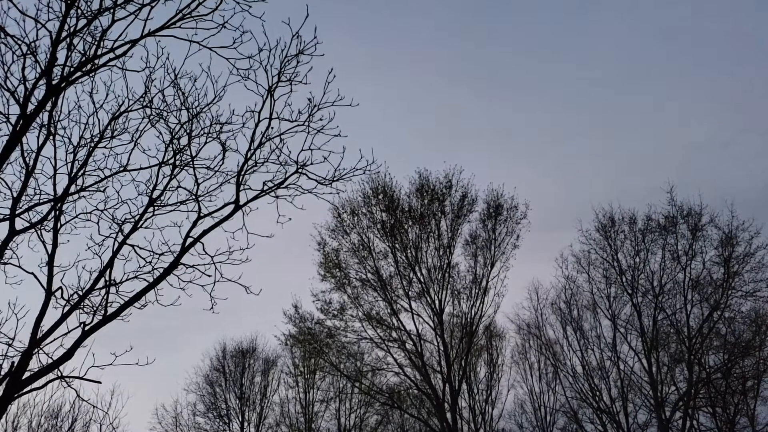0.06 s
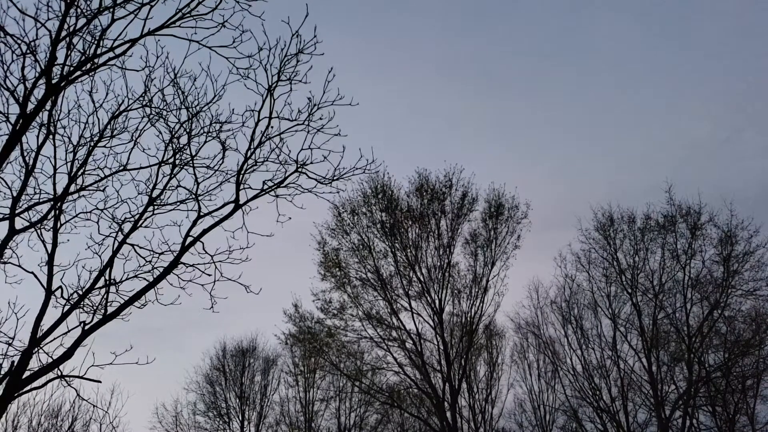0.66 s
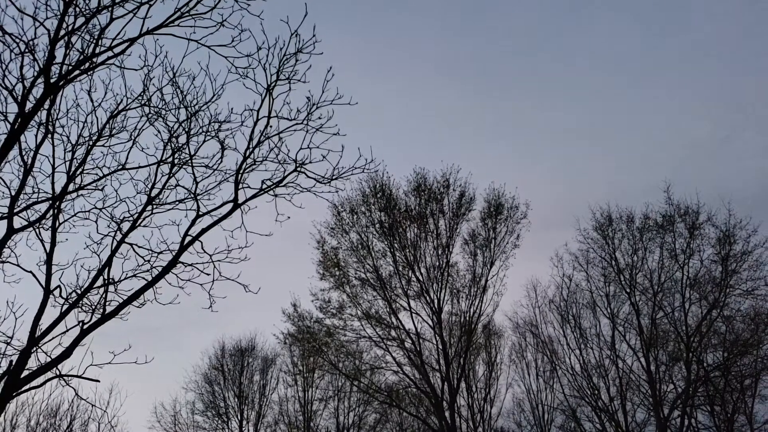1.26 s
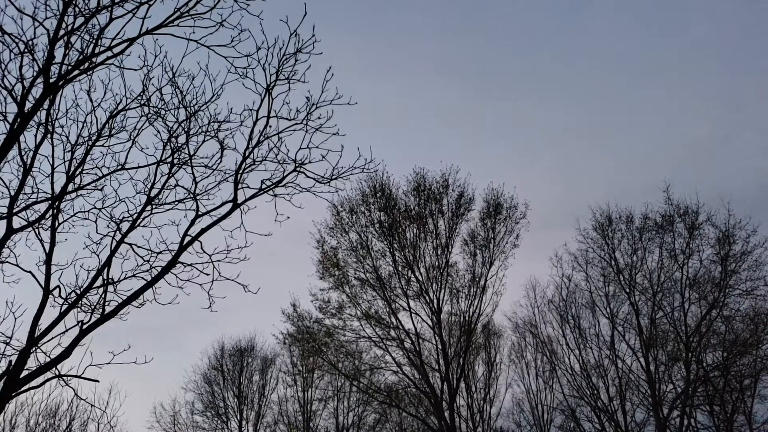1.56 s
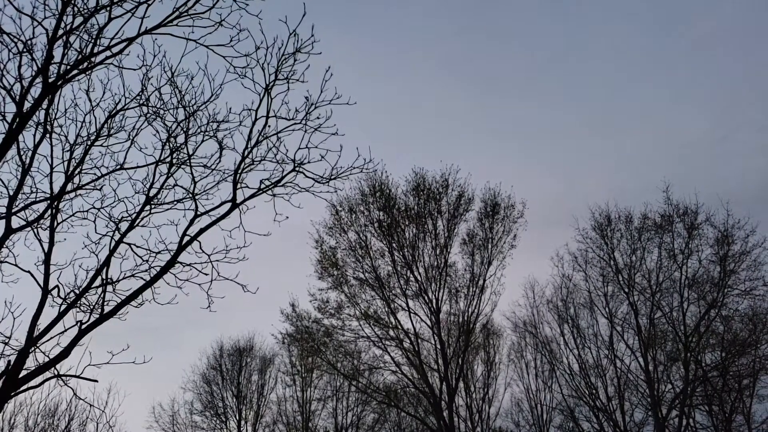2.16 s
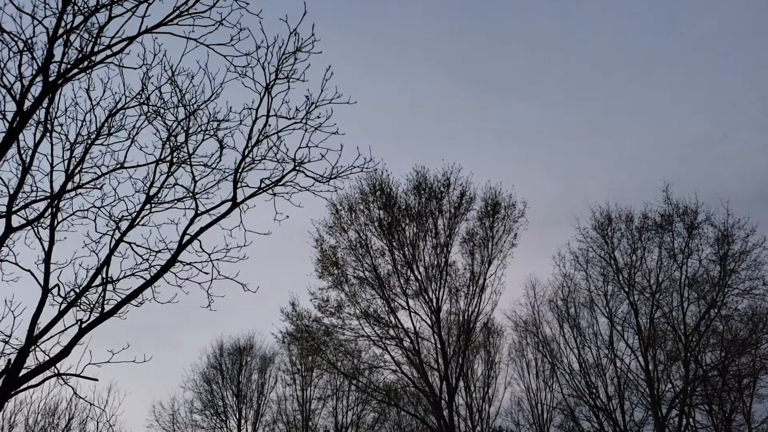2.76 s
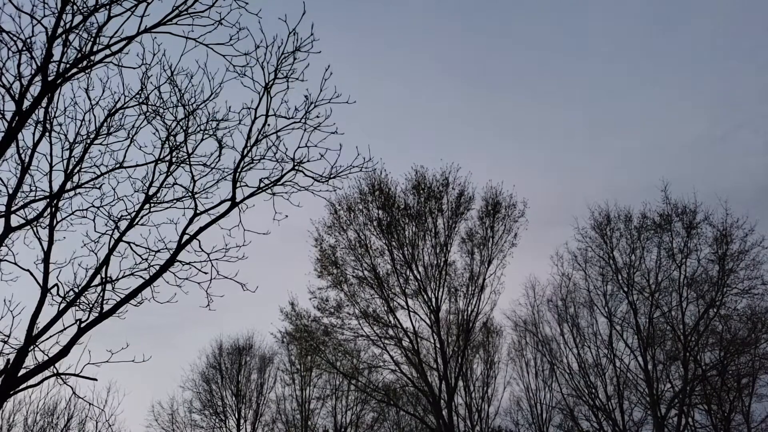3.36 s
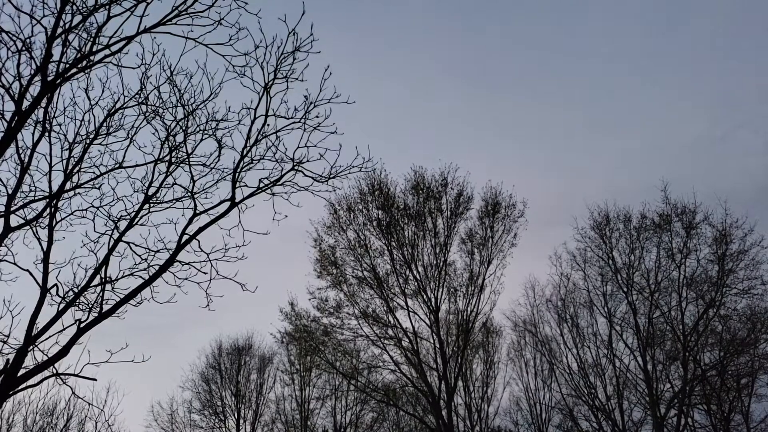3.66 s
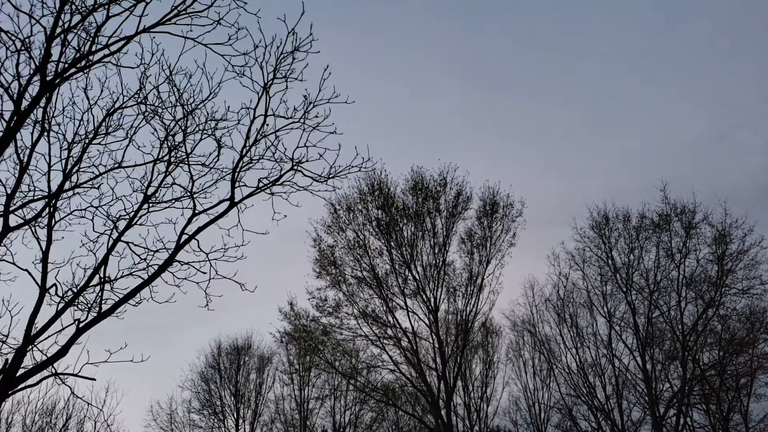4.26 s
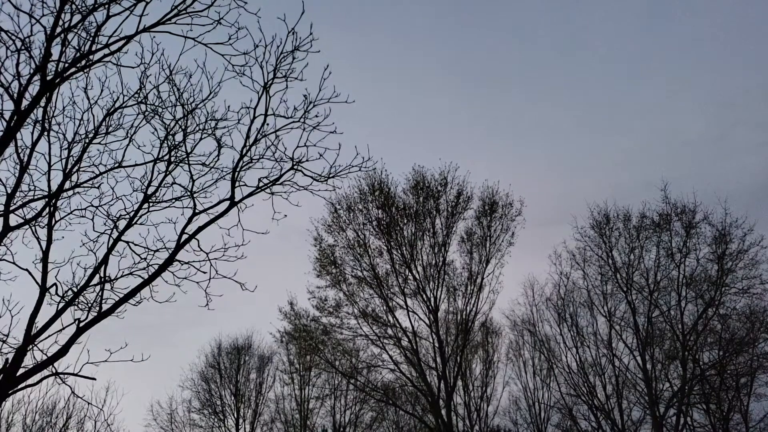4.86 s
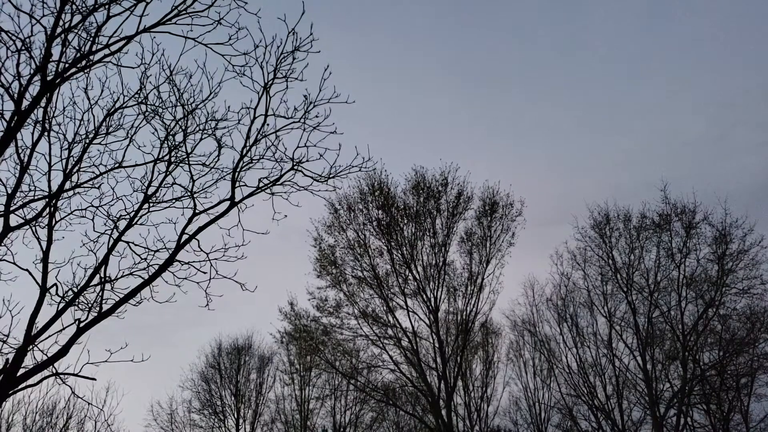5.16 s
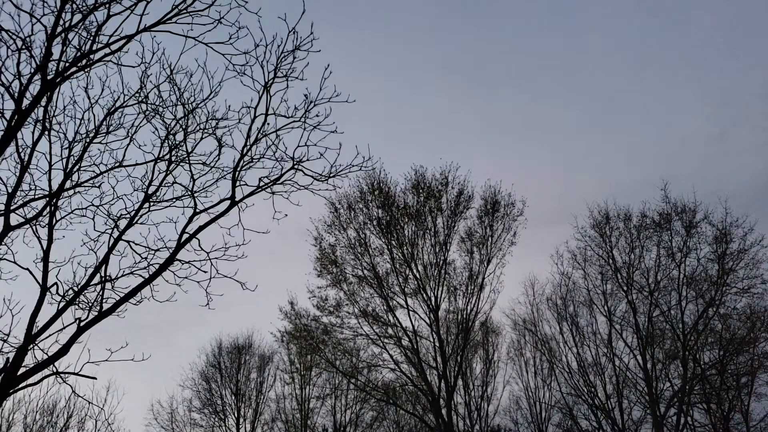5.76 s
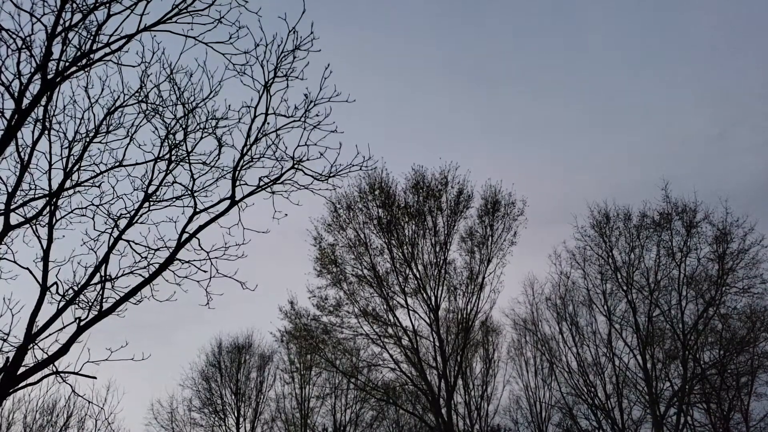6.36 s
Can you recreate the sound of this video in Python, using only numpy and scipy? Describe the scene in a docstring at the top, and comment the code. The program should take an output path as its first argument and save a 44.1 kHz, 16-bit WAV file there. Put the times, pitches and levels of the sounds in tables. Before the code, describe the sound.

A nightingale sings short, varied phrases of whips, trills and whistles among trees, with faint distant birds over a low rumble and hiss.

```python
"""Over a distant rumble and a faint hiss, a nightingale opens with swooping whips and warbles at dusk.
Low chucks, buzzing trills, a rattle and rising whistles follow, all from its syrinx (a bird's voice
box): a nearly pure tone that it bends and shakes. Farther off, other birds repeat a soft fluting tune,
chips and a nasal falling whine, and something hums faintly. The twigs and trunks of bare trees scatter
every bird's notes, and two spaced microphones hear it all."""
import sys
import numpy as np
from scipy import signal
from scipy.fft import rfft, irfft, next_fast_len
from scipy.io import wavfile
from scipy.ndimage import uniform_filter1d, map_coordinates

SR = 44100
rng = np.random.default_rng(int(sys.argv[2]) if len(sys.argv) > 2 else 0)


def materialize(psi):
    """Save the field psi as 16-bit PCM at rate SR to the path in sys.argv[1].

    A 1-D psi becomes a single channel; in a 2-D psi each row is a channel.
    """
    bounded = np.clip(np.atleast_2d(psi).T, -1, 1)
    quanta = np.round(bounded * 32767).astype(np.int16)
    wavfile.write(sys.argv[1], SR, quanta)


N = 291942

# Levels in the tables are relative: filters and the final mix turn them up or down.
# The nightingale's note shapes: (time into the note [s], pitch [Hz], level [dB])
WHIP = [(0, 3259, -9.5), (.015, 3940, -12.5), (.027, 5485, -24), (.037, 6327, -5), (.047, 5852, -11.5),
        (.056, 4146, 2.5), (.069, 3197, -3.5), (.098, 2763, -4), (.113, 2517, -11)]  # up to a high turn, then a steep fall that flattens out
TICK = [(0, 2694, -13.5), (.008, 3224, 1), (.014, 4404, -13.5), (.019, 3100, -6.5), (.028, 2430, -8)]  # a quick peak in pitch after each whip
CHUCK_LOW = [(0, 2757, 5), (.012, 2214, 1.5), (.03, 2030, 0.5), (.056, 1552, -20.5)]  # one side of the syrinx falls in pitch...
CHUCK_HIGH = [(.008, 3633, -11), (.023, 2797, -2.5), (.039, 2200, -3), (.057, 1963, -7)]  # ...and the other follows, higher
PLUNGE = [(0, 2204, 6), (.0055, 3282, 4.5), (.015, 2318, 4.5), (.028, 2167, 3), (.043, 1830, -9.5),
          (.06, 1539, -7), (.077, 1540, -11.5)]  # a flick up and a long slide to the bottom of the voice
TOOT = [(0, 2070, -3), (.013, 2013, 7), (.028, 1970, -8.5), (.042, 1880, 12)]  # a low answer to each slide
HOOK = [(0, 2397, -16), (.009, 3095, -10), (.027, 3288, 7.5), (.031, 4155, -6.5), (.038, 2422, -8.5),
        (.052, 2860, 0.5), (.065, 2576, -6), (.08, 2178, -22)]  # an arch with a flick on top
RISE = [(0, 2267, -9), (.013, 2580, -4.5), (.026, 3160, -1), (.042, 3373, 8), (.057, 3684, -12),
        (.073, 3684, -1.5), (.09, 3730, -17), (.117, 3830, -25)]  # a whistle that climbs out of the hook
# A pure start that leaps into a wide shake:
# (time into the note [s], pitch [Hz], level [dB], shake depth [Hz])
ZIP = [(0, 4650, -15, 50), (.009, 4170, 3.5, 130), (.016, 5230, -9, 610), (.028, 5660, -4, 530),
       (.037, 5600, -46, 450)]
# When each shape is sung: (time [s], level [dB], swell from start to end [dB])
WHIP_EVENTS = [(.536, -27.5, -2), (0.883, -24.5, -16.5)]
TICK_EVENTS = [(0.676, -23.5, 0), (1.036, -25.5, -1.7)]
CHUCK_EVENTS = [(2.188, -38.5, -3), (2.3, -35.5, 3), (2.417, -37.5, 2)]
PLUNGE_EVENTS = [(4.51, -39, 0.5), (5.129, -36.5, -1)]
TOOT_EVENTS = [(4.586, -39.5, -3), (4.978, -39.5, -7), (5.213, -39, -11)]
HOOK_EVENTS = [(6.244, -26.5, -7), (6.477, -29, 2)]
RISE_EVENTS = [(6.322, -25, 0), (6.566, -30.5, 0)]
ZIP_EVENTS = [(3.394, -26, 7), (3.455, -24.5, -3), (3.508, -24.5, 12), (3.723, -31, 29), (3.786, -27, 6),
              (3.854, -32.5, 22)]
# Held, shaken notes: (time [s], length [s], pitch [Hz], level [dB])
WARBLES = [(0.721, .114, 2425, -30), (1.081, .086, 2402, -33)]
# A low rattling buzz: (time [s], pitch [Hz], level [dB], shake depth [Hz])
RATTLE = [(4.714, 2473, -42, 202.5), (4.74, 2297, -33, 227), (4.86, 2245, -34.5, 248),
          (4.89, 2126, -38, 211)]
# Notes sung once, point by point: (time [s], pitch [Hz], level [dB])
BUZZES = [
    [(3.267, 4960, -54), (3.295, 4710, -42), (3.313, 4090, -28.5), (3.333, 3490, -21), (3.359, 3236, -26),
     (3.371, 2370, -44.5)],
    [(3.561, 4220, -34), (3.584, 4214, -25), (3.607, 3814, -23.5), (3.63, 3430, -18), (3.68, 3240, -26),
     (3.689, 2610, -42.5)],
]  # two long falling buzzes
SLIDE = [(4.893, 2550, -28.5), (4.929, 2084, -32.5), (4.942, 1708, -44.5), (4.976, 1603, -39)]  # the low end of the rattle
FLOURISH = [
    [(6.083, 5420, -56), (6.093, 3545, -23), (6.101, 4120, -30.5), (6.109, 5540, -38)],
    [(6.106, 2930, -34), (6.114, 4060, -21), (6.132, 4180, -29.5), (6.15, 4000, -35)],
    [(6.135, 6040, -39), (6.153, 5740, -37), (6.172, 5500, -37.5), (6.208, 5160, -43)],
]  # three linked notes
# The colour of the song: (frequency [Hz], level [dB])
CLEAN_OVERTONES = [(4000, -17), (5200, -20.5), (6200, -31.5), (7200, -20.5), (8700, -31), (9900, -20),
                   (11000, -6), (11800, -10.5), (12800, -17), (14000, -10), (16000, 0)]  # what the throat lets through in clean notes and trills
RASPY_OVERTONES = [(3500, -26.5), (4800, -29), (6200, -32.5), (7100, -35.5), (8500, -43), (9800, -36.5),
                   (11000, -39), (12300, -31), (14000, -44), (15500, -42)]  # the same for low notes
WARBLE_OVERTONES = [(4800, -22.5), (7200, -26), (9600, -65), (12000, -42), (14000, -29.5), (16000, -66)]  # the same for warbles
SONG_COLOUR = [(2500, 0), (3300, .5), (4200, 0), (5000, -5.5), (5800, -2), (6600, -2), (10500, 3),
               (13000, -2), (15500, 3)]  # the near song's overall tone, with a dip around 5 kHz

# A farther bird's whines: (time [s], length [s], start pitch [Hz], end pitch [Hz], level [dB])
WHINES = [(1.999, 0.32, 855, 744, -62), (2.539, 0.33, 891.5, 725, -68), (4.773, .34, 849.5, 727, -64)]
# What its throat lets through: (frequency [Hz], level [dB])
WHINE_THROAT = [(2500, -53), (2900, 11), (3400, 15.5), (4100, -17), (4550, -2.5), (5100, -0.5),
                (5700, -7.5), (6300, -4.5), (6800, -6.5), (7600, -11), (8500, -33), (10000, -65)]
# A distant fluting tune: (time into the tune [s], pitch [Hz], level [dB])
FLUTE = [(0, 2574, 1), (.02, 2717, 8.5), (.047, 2764, 10), (.062, 2608, 9.5), (.073, 2304, 0),
         (.09, 2700, 4), (.112, 2350, 2), (.135, 2520, 4), (.16, 2300, -35)]
# Short glides: (time [s], length [s], start pitch [Hz], end pitch [Hz], level [dB])
SEESAW = [(0, 0.0245, 3260, 3900, -0.5), (0.064, .02, 5300, 5830, -15.5), (0.101, .034, 5820, 4800, -15),
          (.179, 0.034, 4550, 3020, -5)]  # a call of two chips up and two down, timed from its own start
CHIPS = [(0.217, 0.01, 7100, 7800, -58.5), (0.386, 0.019, 4470, 3870, -60.5),
         (0.443, 0.047, 2690, 2670, -58), (1.945, 0.017, 3126, 3950, -47.5),
         (2.367, 0.0095, 7170, 7650, -57.5), (3.909, 0.15, 2383, 2134, -61.5),
         (4.563, 0.042, 3470, 3393, -54), (5.653, 0.14, 6860, 6790, -76)]  # faint single chips and thin whistles
# When the tune and the see-saw call are sung: (time [s], level [dB])
FLUTE_EVENTS = [(1.376, -55), (1.606, -53), (1.838, -52.5), (2.061, -52), (2.529, -54), (2.923, -64.5),
                (5.607, -55), (5.837, -53.5), (6.062, -51.5)]
SEESAW_EVENTS = [(1.246, -47.5), (1.592, -49)]

# The beak points away, so the straight path is weakened: (frequency [Hz], level [dB])
BEAK_SHADE = [(3000, -7.5), (6000, -11.5), (12000, -8)]
# How long the trees echo: (frequency [Hz], time to fade by 60 dB [s])
WOOD_DECAY = [(1500, 0.73), (3000, 0.51), (6000, 0.54), (12000, 0.37)]
# Which side is louder: (frequency [Hz], left minus right [dB])
SONG_BALANCE = [(1800, -4), (2200, -3), (2500, -.5), (3000, 4.5), (4000, 6), (6000, 4), (12000, 3.5)]
AIR_BALANCE = [(60, 2), (150, 2.0), (380, 2), (950, -4), (2380, -2), (5980, 2), (15000, 0)]
# A faint far hum: (time [s], pitch [Hz], level [dB])
HUM = [(0.196, 167, -67), (.45, 175.2, -54), (.95, 170.7, -60.5), (1.15, 172.4, -70), (1.6, 167, -71)]
# The colour of the rumble and hiss: (frequency [Hz], level [dB])
AIR_COLOUR = [(13, -77), (22, -25), (59, 1), (109, -2.5), (147, -8), (326, -10), (354, -13), (667, -14),
              (954, -23), (2060, -32.5), (2240, -25.5), (2570, -22.5), (3480, -27.5), (5110, -44.5),
              (15800, -59.5)]
# How alike they are left and right: (frequency [Hz], likeness [1 the same, -1 opposite])
AIR_LIKENESS = [(60, 1), (130, 0.96), (290, 0.92), (640, 0.33), (1410, -0.75), (3100, 0.39), (6820, -0.11),
                (15000, -0.916)]


def nightingale():
    """The near singer's five kinds of note, with one overall tone colour."""
    clean = (sung(WHIP, WHIP_EVENTS) + sung(TICK, TICK_EVENTS) + FLOURISH
             + sung(HOOK, HOOK_EVENTS) + sung(RISE, RISE_EVENTS))
    throaty = (sung(CHUCK_LOW, CHUCK_EVENTS) + sung(CHUCK_HIGH, CHUCK_EVENTS)
               + sung(PLUNGE, PLUNGE_EVENTS) + [SLIDE] + sung(TOOT, TOOT_EVENTS))
    warbles = [warble(*row) for row in WARBLES]
    trills = [buzz(curve) for curve in BUZZES] + sung(ZIP, ZIP_EVENTS)
    song = plain_notes(clean, CLEAN_OVERTONES, jitter=.004, fall_db=36)
    song += plain_notes(throaty, RASPY_OVERTONES, jitter=.023, fall_db=1)
    song += shaken_notes(warbles, WARBLE_OVERTONES, shake_hz=56, throb_db=-2, jitter=.021, fall_db=1.5)
    song += shaken_notes(trills, CLEAN_OVERTONES, shake_hz=120, throb_db=2, jitter=.004, fall_db=31)
    song += shaken_notes([RATTLE], RASPY_OVERTONES, shake_hz=123.3, throb_db=-.5,
                         jitter=.0208, fall_db=-.5)
    return filtered(song, lambda hz: amp(along(SONG_COLOUR, hz)))


def sung(shape, events):
    """One note per event: the shape moved to its time and level, swelling or fading as it goes."""
    length = shape[-1][0]
    return [[(start + t, hz, db + shape_db + swell_db * (t / length - .5), *rest)
             for t, hz, shape_db, *rest in shape]
            for start, db, swell_db in events]


def warble(start, length, hz, db, depth_hz=112, sag_hz_per_s=820, release_s=.0163):
    """The path of one warble, whose held pitch slowly sinks."""
    hold = length - release_s
    corners = [(0, hz - 150, db - 1), (.0147, hz, db),  # scoop up
               (hold, hz - sag_hz_per_s * hold, db),
               (length, hz - 310, db - 6.5)]  # drop away
    return [(start + t, pitch, level, depth_hz) for t, pitch, level in corners]


def buzz(curve, calm_hz=3050, shake_share=.27, open_s=.041):
    """The path of one buzz: a pure start, then a shake that opens and narrows as the pitch falls."""
    start = curve[0][0]
    return [(t, hz, db, shake_share * max(0, hz - calm_hz) * min(1, (t - start) / open_s))
            for t, hz, db in curve]


def plain_notes(notes, overtones, jitter, fall_db):
    """Notes that each glide along one smooth pitch path."""
    out = np.zeros(N)
    for rows in notes:
        t, hz, loud = gesture(rows)
        add(out, rows[0][0], loud * syrinx(hz, jitter, overtones, fall_db))
    return out


def shaken_notes(notes, overtones, shake_hz, throb_db, jitter, fall_db):
    """Notes whose pitch swings fast; a positive throb makes the bottom of each swing the loudest."""
    out = np.zeros(N)
    for rows in notes:
        t, hz, loud, depth_hz = gesture(rows)
        swing = np.cos(2 * np.pi * shake_hz * t)
        tone = syrinx(hz - depth_hz * swing, jitter, overtones, fall_db)
        add(out, rows[0][0], loud * amp(throb_db * swing) * tone)
    return out


def syrinx(hz, jitter, overtones, fall_db, throat_hz=2100):
    """A nearly pure tone; its overtones stand out when it sinks below the throat's own ringing pitch."""
    harmonic = np.arange(2, 11)[:, None]
    phase = cycles(hz, jitter)
    boost_db = 36 * np.maximum(0, np.log2(throat_hz / hz))
    slope_db = fall_db * np.log2(harmonic / 2)  # overtones lose fall_db with each octave
    leak = amp(along(overtones, harmonic * hz) + boost_db - slope_db) * (harmonic * hz < SR / 2)
    return np.sin(phase) + np.sum(leak * np.sin(harmonic * phase), axis=0)


def whining_bird(bend=1.8, waver_db=1.5, wavers_per_s=9.3):
    """A nasal buzz that falls ever faster; the throat passes only its upper harmonics."""
    out = np.zeros(N)
    harmonic = np.arange(3, 13)[:, None]
    for start, length, start_hz, end_hz, db in WHINES:
        t, _, loud = gesture([(0, start_hz, db + .5), (length / 10, start_hz, db), (length, end_hz, db)])
        hz = start_hz + (end_hz - start_hz) * (t / length) ** bend
        waver = waver_db * np.array([wobble(wavers_per_s, len(t)) for _ in harmonic])
        gains = amp(along(WHINE_THROAT, harmonic * hz) + waver)
        tone = np.sum(gains * np.sin(harmonic * cycles(hz, jitter=.002)), axis=0)
        add(out, start, loud * tone)
    return out


def far_birds():
    """Pure whistles: a fluting tune, a little higher or lower each time, a see-saw call and chips."""
    out = np.zeros(N)
    t, hz, loud = gesture(FLUTE, glide_s=.0019)
    for start, db in FLUTE_EVENTS:
        tuning = 1 + .006 * rng.standard_normal()
        add(out, start, amp(db) * loud * np.sin(cycles(hz * tuning, jitter=.004)))
    seesaws = [(start + after, *glide, db + chip_db)
               for start, db in SEESAW_EVENTS for after, *glide, chip_db in SEESAW]
    for start, length, start_hz, end_hz, db in seesaws + CHIPS:
        t, hz, loud = gesture([(0, start_hz, db), (length, end_hz, db)], edge_s=.0026)
        add(out, start, loud * np.sin(cycles(hz, jitter=.011)))
    return out


def among_trees(song, balance, lead_ms, twigs_db, twigs_fade_s, wood_db, wood_lean=.16):
    """The straight path and the twigs' echoes come from the perch; the wood answers from all round."""
    straight = filtered(song, lambda hz: amp(along(BEAK_SHADE, hz)))
    perch = straight + amp(twigs_db) * twig_echoes(song, twigs_fade_s)
    wood = filtered(wood_echoes(song, wood_db), lambda hz: panned(wood_lean * along(balance, hz)))
    return at_microphones(perch, balance, lead_ms) + wood


def twig_echoes(song, fade_s, directions=12):
    """Quick echoes from the branches round the perch; they change as the bird turns its head."""
    out = np.zeros((2, N))
    t = np.arange(SR // 4) / SR
    facing = np.linspace(0, directions - 1, N)
    for direction in range(directions):
        spikes = rng.standard_normal((3, len(t))) ** 3  # a few strong echoes among many weak ones
        twigs = spikes[0] + spikes[1:]  # shared echoes plus each side's own
        tails = unit(twigs * amp(-60 * t / fade_s) * (t > .004)) / np.sqrt(len(t))
        share = np.maximum(0, 1 - abs(facing - direction))
        active = np.flatnonzero(share)
        for side, tail in zip(out, tails):
            add(side, active[0] / SR, signal.fftconvolve((song * share)[active], tail))
    return out


def wood_echoes(song, db):
    """The trunks scatter the song so that it rings on, longest in the low notes."""
    hz, t, noise = signal.stft(rng.standard_normal((2, SR)), SR, nperseg=256)
    fade = amp(-60 * t / along(WOOD_DECAY, hz)[:, None])
    tails = signal.istft(noise * fade, SR, nperseg=256)[1][:, :SR]
    return signal.fftconvolve(song[None], amp(db) * unit(tails) / np.sqrt(SR), axes=1)[:, :N]


def at_microphones(sound, balance, lead_ms):
    """The left microphone hears the sound lead_ms earlier; each side has its own colour."""
    shift_s = np.array([[1], [-1]]) * lead_ms / 1000 / 2
    return filtered(sound, lambda hz: panned(along(balance, hz)) * np.exp(2j * np.pi * hz * shift_s))


def low_hum():
    """A faint, wavering tone far away."""
    out = np.zeros(N)
    t, hz, loud = gesture(HUM, edge_s=.12)
    add(out, HUM[0][0], loud * np.sin(cycles(hz, jitter=.016)))
    return out


def evening_air(level_db=-49.5, drift_db=.27, patchy_db=1):
    """A far, traffic-like rumble, alike in both microphones, under a faint hiss."""
    def colour(hz):
        """Gains for the part both sides share and the part that sets them apart."""
        apart = np.tan(np.arccos(np.clip(along(AIR_LIKENESS, hz), -1, 1)) / 2)
        return amp(along(AIR_COLOUR, hz)) * [np.ones_like(hz), apart]

    spectrum = signal.stft(rng.standard_normal((2, N)), nperseg=1024)[2]
    patches = rng.standard_normal(spectrum.shape[1:])  # slightly louder and softer spots
    patches = uniform_filter1d(uniform_filter1d(patches, 4, axis=0), 16, axis=1)
    noise = signal.istft(spectrum * amp(patchy_db * unit(patches)), nperseg=1024)[1][:, :N]
    mid, side = filtered(noise, colour)
    both = at_microphones(np.array([mid + side, mid - side]), AIR_BALANCE, lead_ms=.11)
    return amp(level_db - drift_db * wobble(1.2, N)) * unit(both)


def gesture(rows, glide_s=.003, edge_s=.004):
    """Time, pitch, loudness and any further curves of one note; muscles round the corners."""
    times, *columns = np.transpose(rows)
    times = np.sort(times) - min(times)
    t = np.arange(int(times[-1] * SR) + 2) / SR
    width = max(1, int(glide_s * SR))
    hz, db, *rest = [uniform_filter1d(np.interp(t, times, c), width, mode="nearest") for c in columns]
    fade = np.sin(np.pi / 2 * np.clip(np.minimum(t, t[-1] - t) / edge_s, 0, 1)) ** 2
    return t, hz, amp(db) * fade, *rest


def cycles(hz, jitter):
    """The phase of an unsteady tone; jitter is its wander as a share of the pitch."""
    return 2 * np.pi * np.cumsum(hz * (1 + jitter * wobble(399, len(hz)))) / SR


def wobble(rate, size):
    """A smooth curve through rate random points a second."""
    return map_coordinates(rng.standard_normal(int(size * rate / SR) + 4), [np.arange(size) * rate / SR])


def amp(db):
    """Turn decibels into a gain."""
    return 10 ** (np.asarray(db) / 20)


def unit(x):
    """Scale to an average power of 1."""
    return x / np.sqrt(np.mean(x ** 2) + 1e-20)


def along(points, hz):
    """Read between the rows of a (frequency [Hz], value) table, with octaves evenly spaced."""
    frequencies, values = np.transpose(points)
    return np.interp(np.log(hz + 1), np.log(frequencies + 1), values)


def filtered(x, response):
    """Scale and delay each frequency as response(hz) says."""
    size = next_fast_len(N + SR // 2)
    return irfft(rfft(x, size) * response(np.fft.rfftfreq(size, 1 / SR)), size)[..., :N]


def panned(db):
    """Left and right gains that lie db apart."""
    return amp(np.array([np.atleast_1d(db), -np.atleast_1d(db)]) / 2)


def add(track, start_s, sound):
    """Mix a sound into the track at its start time."""
    part = track[max(0, round(start_s * SR)):][:len(sound)]
    part += sound[:len(part)]


def scene():
    """Birds near and far over the evening air."""
    near = among_trees(nightingale(), SONG_BALANCE, lead_ms=.42,
                       twigs_db=-5.5, twigs_fade_s=.07, wood_db=-12.5)
    whine = among_trees(whining_bird(), balance=[(3000, 16)], lead_ms=.067,
                        twigs_db=-3.5, twigs_fade_s=.08, wood_db=1)
    far = among_trees(far_birds(), balance=[(2700, -6), (5000, 14.5)], lead_ms=.034,
                      twigs_db=-9.5, twigs_fade_s=.067, wood_db=-7.5)
    return amp(4.5) * near + amp(-.5) * whine + amp(5) * far + low_hum() + evening_air()


def record(dry, top_hz=15850):
    """Cut away the very highest treble."""
    return filtered(dry, lambda hz: hz < top_hz)


dry = scene()
out = record(dry)
materialize(out)
```